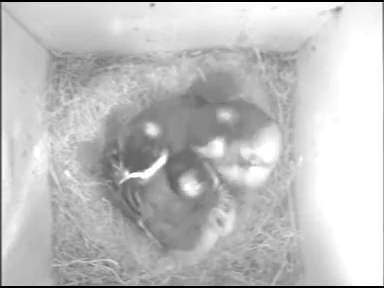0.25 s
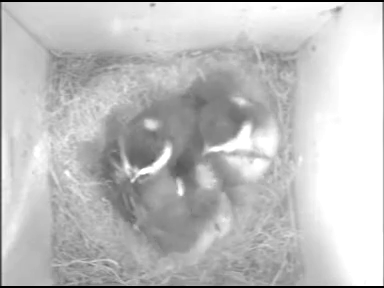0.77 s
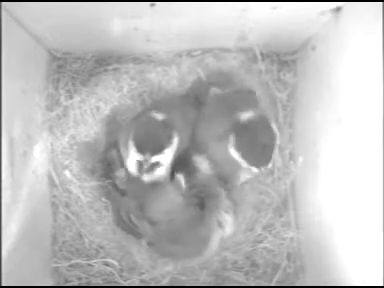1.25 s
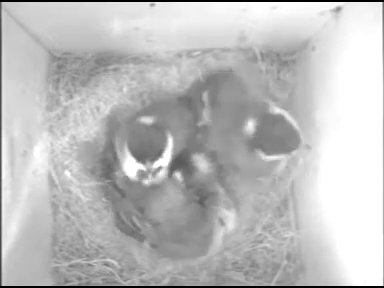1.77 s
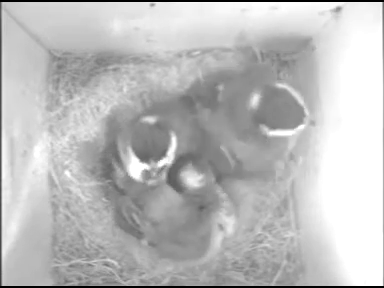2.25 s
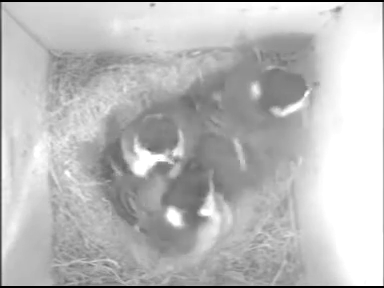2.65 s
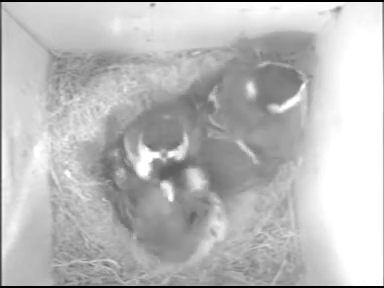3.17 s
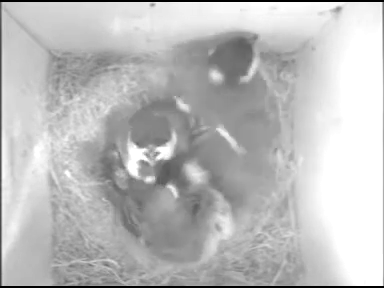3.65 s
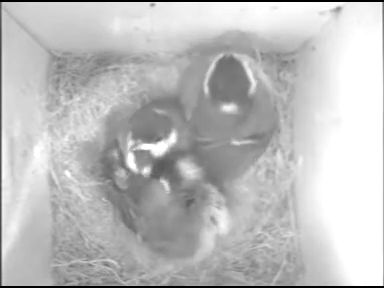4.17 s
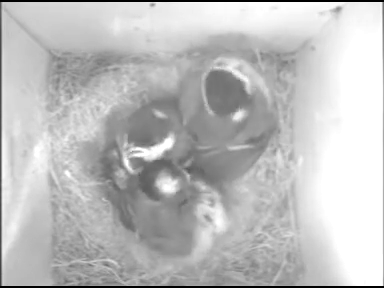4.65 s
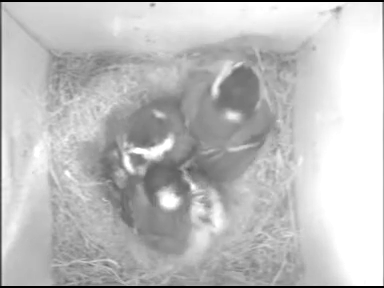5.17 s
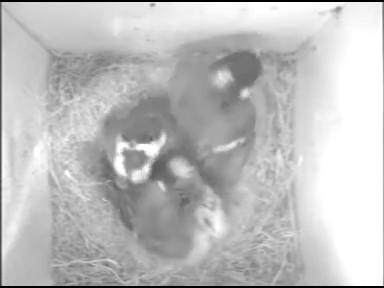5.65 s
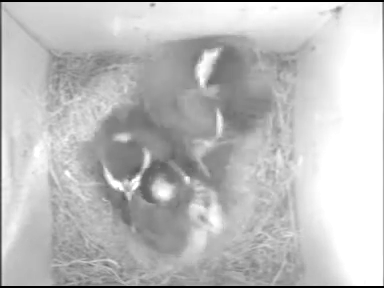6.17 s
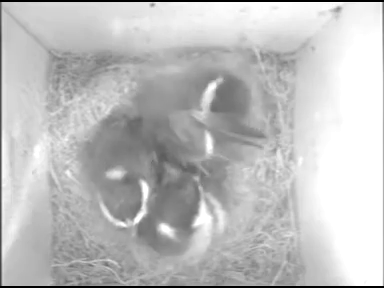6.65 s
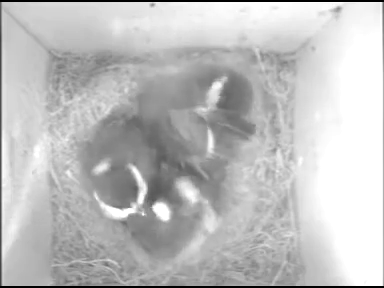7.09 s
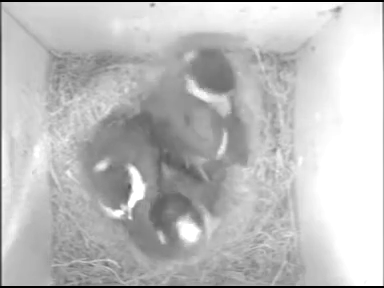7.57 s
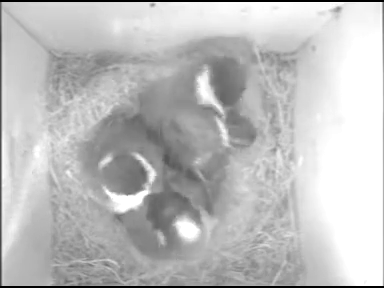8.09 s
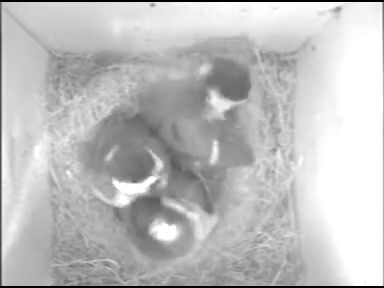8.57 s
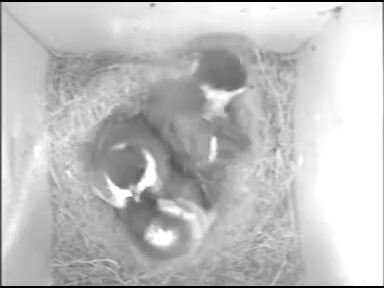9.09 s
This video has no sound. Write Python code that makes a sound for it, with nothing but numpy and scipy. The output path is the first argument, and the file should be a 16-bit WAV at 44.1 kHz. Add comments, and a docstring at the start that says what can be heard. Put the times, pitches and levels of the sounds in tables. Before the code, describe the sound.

Young birds peep and screech shrilly close to a small microphone, with faint scuffs in the nest, dull rumble and hum.

```python
"""Mains hum, a dull rumble and a thin electronic whine lie under everything; then nestlings beg in a wooden
nest box, close to a small camera microphone: runs of short rising peeps and longer, held, raspy screeches.
Each call sums two voices, one from each side of the syrinx, with turbulent rasp from coloured noise.
Shaped-noise scuffs stir in the nest, and gliding sines make a thin far twitter outside the box.
The overloaded preamplifier adds a low growl, strongest on loud calls."""
import sys
import numpy as np
from scipy import signal
from scipy.fft import rfft, irfft
from scipy.io import wavfile
from scipy.ndimage import map_coordinates

SR = 44100
rng = np.random.default_rng(int(sys.argv[2]) if len(sys.argv) > 2 else 0)


def pcm_store(signal):
    """Save signal as 16-bit PCM."""
    levels = np.round(np.clip(np.atleast_2d(signal), -1, 1) * 32767)
    wavfile.write(sys.argv[1], SR, levels.astype(np.int16).T)


N = 411007
LONGEST = 8192   # samples, more than any call


def from_db(db):
    """Decibels to amplitude gain."""
    return 10 ** (np.asarray(db) / 20)


def rms_one(x):
    """Scale to unit power."""
    return x / np.sqrt(np.mean(x ** 2) + 1e-20)


def colour(x, spectrum):
    """Shape white noise to dB points joined on a log-frequency axis; unit power."""
    hz, db = np.transpose(spectrum)
    bins = np.maximum(np.fft.rfftfreq(len(x), 1 / SR), 1)
    gain = from_db(np.interp(np.log(bins), np.log(hz), db))
    return rms_one(irfft(rfft(x) * gain, len(x)))


def shaped_noise(spectrum, size):
    """Coloured noise of about unit power."""
    return colour(rng.standard_normal(max(size, LONGEST)), spectrum)[:size]


def butter(x, hz, kind, order):
    """Causal Butterworth filter."""
    return signal.sosfilt(signal.butter(order, hz, kind, fs=SR, output="sos"), x)


def wobble(rate_hz, size):
    """Random unsteadiness, mostly slower than the given rate, spread about 1."""
    span = max(size, LONGEST)
    slow = butter(rng.standard_normal(2 * span), rate_hz, "low", order=2)
    return rms_one(slow[span:])[:size]   # the filter has run in by then


def phase_of(pitch):
    """Phase in radians of a voice that follows a pitch in Hz."""
    return 2 * np.pi * np.cumsum(pitch) / SR


def add(track, start, sound):
    """Mix a sound into the track at a time in seconds."""
    at = int(start * SR)
    part = sound[:max(N - at, 0)]
    track[at:at + len(part)] += part


def background():
    """Rumble and faint hiss as coloured noise of slightly unsteady level; hum and whine as steady sines."""
    # mains hum: (f/Hz, rms level/dB)
    hum_lines = [(50, -48.5), (100, -49), (150, -58.5), (250, -55), (300, -58), (350, -57)]
    # thin whine of the camera's electronics: (f/Hz, rms level/dB)
    whine_lines = [(4947, -68.5), (9647, -86.5), (11025, -79.5), (12403, -91)]
    # spectrum of the noise floor: (f/Hz, relative level per Hz/dB)
    floor_spectrum = [(20, -26.5), (40, -13), (75, -10.5), (125, -5.5), (185, 2), (250, -10.5), (380, -6),
                      (480, -8.5), (850, -14), (1600, -21.5), (3100, -32.5), (5100, -29), (6600, -40.5),
                      (11000, -44), (11500, -72)]
    t = np.arange(N) / SR
    tones = np.zeros(N)
    for hz, db in hum_lines + whine_lines:
        tones += from_db(db) * np.sqrt(2) * np.sin(2 * np.pi * (hz * t + rng.random()))
    floor = from_db(-42.5) * shaped_noise(floor_spectrum, N)
    return tones + floor * from_db(0.904 * wobble(19, N))


def contour(length, rise_s, sink_s, start_hz, swept_hz, held_hz, late_hz, droop):
    """Pitch of a call in Hz: sweep up, settle, glide to the late pitch, sink; slightly unsteady."""
    t = np.arange(int(length * SR)) / SR
    settled_s = rise_s + .015
    turns = [0, rise_s, settled_s, max(length - sink_s, settled_s), length]
    pitch = np.interp(t, turns, [start_hz, swept_hz, held_hz, late_hz, late_hz * droop])
    return pitch * (1 + .004 * wobble(77.0, len(t)))


def rasping(pitch, spectrum, count, likeness):
    """Chaotic vibration nearly repeats every few (count) cycles: rasp in strands that slide with the pitch."""
    white = rng.standard_normal(2 * LONGEST)
    now = LONGEST + np.arange(len(pitch))
    lag = count * SR / pitch   # samples
    strands = sum(likeness ** k * map_coordinates(white, [now - k * lag]) for k in range(3))
    return colour(strands, spectrum)


def call(pitch, level_db, balance_db, swell_db, lift_db, interval, rasp_db, rasp_spectrum, rise_s, speak_s,
         release_s, count, likeness, jitter, chaos, shimmer, edge_db, tone_lag, rasp_lag):
    """One begging call: air pressure builds, is shared between the two voices, and sinks."""
    # partials of the first voice, the open beak favouring the octave: (multiple of pitch, level/dB)
    harmonics = [(1, -14), (2, -2), (3, -13.5), (4, -28)]
    # mixing of the two voices: (harmonic of the first voice,
    # steps of the voices' spacing, rounded below to whole steps, level re second voice/dB)
    sidebands = [(1, 0.5, -11.5), (1, 1.5, -15.5), (2, -1, -20.5), (2, 1, -2.5), (2, 2, -9.5), (2, 3, -21)]
    size = len(pitch)
    t, length = np.arange(size) / SR, size / SR
    first_db = level_db - 10 * np.log10(1 + from_db(balance_db) ** 2)
    opening = np.clip(t / rise_s, 0, 1)
    closing = np.clip((length - t) / release_s, 0, 1)

    first = phase_of(pitch * (1 + jitter * wobble(470.0, size)))
    # the second side of the syrinx wanders about its interval above the octave
    second = phase_of(pitch * (2 + interval) * (1 + chaos * wobble(440, size)))
    spacing = second - 2 * first

    tone = np.zeros(size)
    for k, db in harmonics:
        tone += from_db(db + lift_db * (k == 1)) * np.sin(k * first)
    tone = from_db(first_db) * np.sqrt(2) * tone * (1 + 0.1 * wobble(200, size))

    mixed = np.zeros(size)
    for k, steps, db in sidebands:
        angle = k * first + round(steps) * spacing + rng.uniform(0, 2 * np.pi)
        mixed += from_db(db) * np.sin(angle)
    flutter = rms_one(1 + shimmer * wobble(490, size))
    mixed = from_db(first_db + balance_db) * np.sqrt(2) * mixed * flutter

    rasp = from_db(level_db + rasp_db) * rasping(pitch, rasp_spectrum, count, likeness)

    # each part builds and dies along its own curve
    voice = tone * np.clip(t / speak_s, 0, 1) ** tone_lag * closing ** 2.8
    voice += mixed * opening ** .9 * closing ** 1.65
    voice += rasp * opening ** rasp_lag * closing ** 1.5
    swell = from_db(swell_db * (t / length - .5))

    # as the pressure goes, the syrinx drops into a lower, buzzing register
    slack = phase_of(.71 * pitch * (1 + .03 * wobble(460, size)))
    buzz = .5 * np.sin(slack) + 1.0 * np.sin(2 * slack) + 0.16 * np.sin(3 * slack)
    buzz = from_db(edge_db) * buzz * closing ** 1.46 * (1 - closing)

    # a faint hiss starts abruptly as the membranes part, then fades
    chip_spectrum = [(1300, -12.5), (2050, -0.5), (3200, -11.0), (4300, -7.5),
                     (5500, 2.5), (6800, -24.5), (10000, -44.0)]
    chip = from_db(-37.5) * shaped_noise(chip_spectrum, size) * np.exp(-t / .02)
    return voice * swell + buzz + chip


def peeps():
    """Short, fairly clear calls that sweep up quickly, keep climbing and sink only at the very end."""
    # short calls: (t/s, length/s, pitch after the sweep f/Hz, level/dB, second voice re first/dB,
    # swell over the call/dB, lift of the fundamental/dB)
    peep_calls = [(0.608, 0.076, 2618, -19.5, -3, -2, -6), (.73, 0.076, 2770, -20, -8.5, -1.5, 2),
                  (1.292, 0.081, 2780, -18, -9.5, 1, 1), (1.439, 0.088, 2928, -18.5, -5, 0, 1.5),
                  (1.937, 0.081, 2725, -20.5, -4.5, 13.5, 3.5), (2.083, 0.087, 2978, -19.5, -3, -4, -10),
                  (3.151, 0.08, 2637, -17.5, 0.5, 4.5, 1.5), (3.26, 0.072, 2861, -16.5, 2, 4, -2),
                  (3.378, 0.081, 3038, -18.5, -4.5, 2.5, -4), (4.8, 0.078, 2635, -18, -8, 0, 0),
                  (4.934, 0.079, 2798, -17, -10.5, 2.5, -8), (5.575, 0.083, 2789, -15, -14, 2, -0.5),
                  (5.701, .086, 2920, -16.5, -7.5, -5.5, 1), (6.883, 0.08, 2690, -19.5, -7, -9, 5),
                  (7.002, 0.078, 2820, -20.5, -4, -10, 9), (7.145, .084, 2974, -19.5, -2, 2.5, 2.5),
                  (7.784, 0.083, 2740, -18, -3.5, -1, 5.5), (7.912, 0.083, 2902, -18.4, -14.5, -2, 3),
                  (8.753, .079, 2770, -15.5, -14, 7.5, 1.5), (8.89, 0.081, 2902, -16, -12, -3, 3)]
    # rasp through throat and beak: (f/Hz, relative level per Hz/dB)
    peep_rasp = [(1400, -9.5), (1900, -2.5), (2600, -10.5), (3500, -5), (4200, -0.5), (5400, 3),
                 (6600, -0.5), (7700, -0.5), (8700, -6.5), (9700, -9), (11200, -14), (13000, -17)]
    rise_s, typical_hz, typical_db = .029, 2800, -18
    climb = .09   # share of the pitch gained between settling and the final sink
    out = np.zeros(N)
    for start, length, hz, level_db, balance_db, swell_db, lift_db in peep_calls:
        # share of the pitch still missing after the sweep: less in higher calls
        shortfall = .04 - 0.2997 * np.log2(hz / typical_hz)
        # the clear tone takes longer to speak in low peeps
        speak_s = 0.022 + 0.19 * shortfall
        pitch = contour(length, rise_s, sink_s=.013, start_hz=1850, swept_hz=hz * (1 - shortfall),
                        held_hz=hz, late_hz=hz * (1 + climb), droop=.97)
        # harder peeps are raspier
        rasp_db = -7.5 + .25 * (level_db - typical_db)
        peep = call(pitch, level_db, balance_db, swell_db, lift_db, interval=.31, rasp_db=rasp_db,
                    rasp_spectrum=peep_rasp, rise_s=rise_s, speak_s=speak_s, release_s=.023,
                    count=3, likeness=.5, jitter=.0045, chaos=.0075, shimmer=.25, edge_db=-17,
                    tone_lag=1.8, rasp_lag=0.81)
        add(out, start, peep)
    return out


def far_twitter():
    """Thin gliding notes of a bird outside: unsteady sines that fade in and out."""
    # faint far notes: (t/s, length/s, first f/Hz, last f/Hz, rms level/dB)
    far_notes = [(.85, 0.13, 5700, 5560, -63), (1.514, .14, 5830, 5900, -58.5),
                 (1.656, .07, 5100, 4450, -62), (7.44, 0.14, 5420, 5500, -68)]
    out = np.zeros(N)
    for start, length, first_hz, last_hz, db in far_notes:
        size = int(length * SR)
        pitch = np.linspace(first_hz, last_hz, size) * (1 + 0.0087 * wobble(300, size))
        note = np.sin(phase_of(pitch)) * np.hanning(size)
        add(out, start, from_db(db) * rms_one(note))
    return out


def scuffs():
    """Bodies shift on dry grass and moss: short, dull, grainy noises."""
    # scuffs in the nest lining: (t/s, length/s, rms level before the box/dB)
    scuff_events = [(1.78, 0.028, -40), (2.001, 0.036, -33), (2.882, 0.12, -44.5), (3.672, 0.045, -37),
                    (3.73, 0.034, -49), (6.195, 0.068, -42), (6.422, 0.24, -52), (6.709, .015, -41.5),
                    (7.103, .015, -52)]
    spectrum = [(100, -1), (450, 9.5), (1000, -11.5), (2000, -12.5), (4000, -33.0), (9000, -42.0)]
    out = np.zeros(N)
    for start, length, db in scuff_events:
        size = int(length * SR)
        grain = shaped_noise(spectrum, size) * (1 + .6 * wobble(200, size))
        add(out, start, from_db(db) * rms_one(grain * np.hanning(size)))
    return out


def screeches():
    """Longer calls held near the top pitch, in which the second voice turns chaotic."""
    # held calls: (t/s, length/s, held pitch f/Hz, level/dB, second voice re first/dB,
    # second voice above the octave/share of pitch, lift of the fundamental/dB)
    screech_calls = [(2.284, .13, 3149, -18, -3.5, 0.3, -1.5), (2.485, .14, 3166, -17.5, -2.5, 0.33, -7.5),
                     (2.704, .13, 3093, -20.8, 5, 0.39, -12), (3.559, .11, 3062, -20.5, -3, 0.46, 3),
                     (3.788, .12, 3034, -20, -3, .5, 3), (3.97, .13, 3081, -19.5, 4, 0.49, 1),
                     (4.164, .12, 3083, -20.5, 3, 0.44, 2.5), (5.849, .11, 3105, -19, -7, 0.55, 3),
                     (6.038, 0.14, 3116, -17.2, -3.5, .44, -3), (6.253, .13, 3080, -21, -4.5, 0.35, -1.5),
                     (8.077, .11, 3050, -20.5, -5, .34, 1), (9.057, .1, 3055, -18, -6.5, .3, 0),
                     (9.262, .083, 3087, -17.5, -11.5, 0.28, 0.5)]
    # rasp through throat and beak: (f/Hz, relative level per Hz/dB)
    screech_rasp = [(1400, -23), (2000, -19), (2800, -18), (3550, -13.5), (4200, -4), (5150, -5.5),
                    (5650, -4.5), (6600, 0.5), (7600, -4.5), (8600, -9), (9700, -17), (13000, -30.5)]
    rise_s, top_hz, typical_interval = .025, 3110, 0.42
    overshoot_per_s = .52   # share of the held pitch per second of call
    chaos_onset_s, chaos_build_s, chaos_at_start = .03, .025, .45
    out = np.zeros(N)
    for start, length, hz, level_db, balance_db, interval, lift_db in screech_calls:
        # the sweep overshoots more in longer calls, settles, then drifts to the bird's top pitch
        pitch = contour(length, rise_s, sink_s=.025, start_hz=1800,
                        swept_hz=hz * (1 + overshoot_per_s * length),
                        held_hz=hz, late_hz=top_hz, droop=.92)
        # more voiced at first, breaking into full chaos as the pitch settles
        t = np.arange(len(pitch)) / SR
        wildness = np.interp(t, [chaos_onset_s, chaos_onset_s + chaos_build_s], [chaos_at_start, 1])
        # the further the two voices part, the harsher the screech
        rasp_db = -3 + 17.5 * (interval - typical_interval) + 10 * np.log10(wildness)
        screech = call(pitch, level_db, balance_db, swell_db=2.5, lift_db=lift_db, interval=interval,
                       rasp_db=rasp_db, rasp_spectrum=screech_rasp, rise_s=rise_s, speak_s=.017,
                       release_s=.032, count=5, likeness=0.21, jitter=.0035, chaos=0.02022 * wildness,
                       shimmer=0.48 * wildness, edge_db=-21.5, tone_lag=1.6, rasp_lag=.8)
        add(out, start, screech)
    return out


def nest_box(x):
    """Wooden walls close to the microphone lift and cancel narrow bands and add a very short, dense tail."""
    # wall colour: (f/Hz, width/Hz, gain/dB)
    box_bands = [(2770, 160, 5), (3730, 1250, -11), (4050, 400, 4.5), (4596, 159.5, -6), (4920, 81.6, 1.5),
                 (5104, 220, -8.5), (5610, 180, 4), (7503, 770, 6), (8910, 380, -13), (9190, 75, -0.5),
                 (9650, 430, -17), (10600, 300, -8.5), (12500, 280, -7.5)]
    t60_s, tail_db = 0.082, -20.5
    for hz, width_hz, db in box_bands:
        b, a = signal.iirpeak(hz, hz / width_hz, fs=SR)
        x = x + (from_db(db) - 1) * signal.lfilter(b, a, x + 1e-18)
    t = np.arange(SR // 6) / SR
    tail = rng.standard_normal(len(t)) * from_db(-60 * t / t60_s)
    tail /= np.linalg.norm(tail)
    return x + from_db(tail_db) * signal.fftconvolve(x, tail)[:N]


def scene():
    """Nestlings and scuffs inside the box, twitter and background outside it; one microphone, both channels."""
    inside = nest_box(peeps() + screeches() + scuffs())
    mono = inside + far_twitter() + background()
    return np.array([mono, mono])


def record(dry, overload=3.88, low_hz=230, high_hz=1950):
    """The preamplifier bends one way, so voices beat into a low growl; tall peaks are rounded, the top is cut."""
    growl = butter(butter(dry ** 2, low_hz, "high", order=2), high_hz, "low", order=2)
    bent = dry - overload * growl
    rounded = bent / (1 + (bent / .86) ** 8) ** (1 / 8)
    top_cut = signal.ellip(12, .1, 80, 12700, fs=SR, output="sos")   # steep low-pass at 12.7 kHz
    return signal.sosfilt(top_cut, rounded)


dry = scene()
out = record(dry)
pcm_store(out)
```